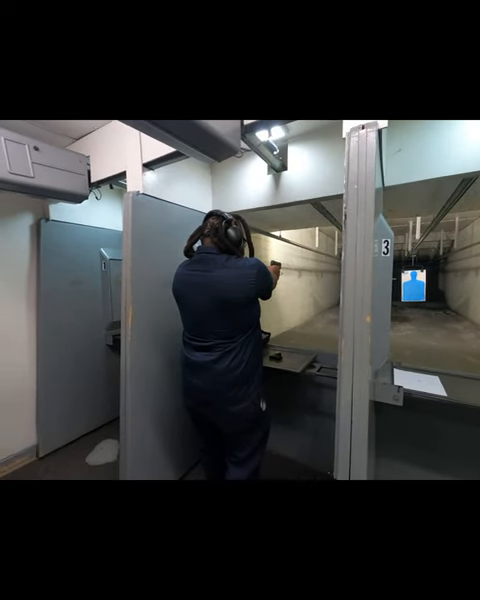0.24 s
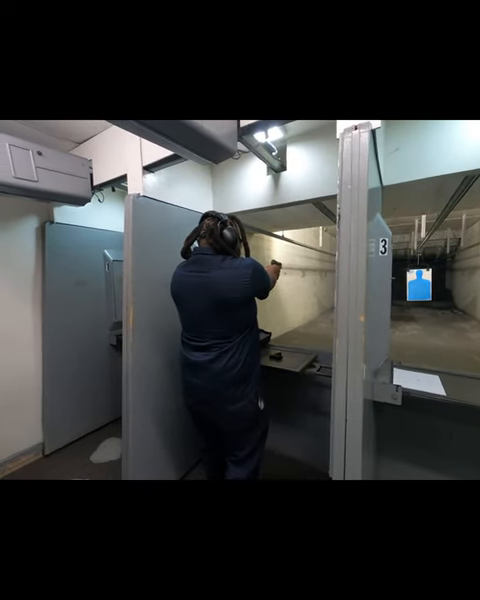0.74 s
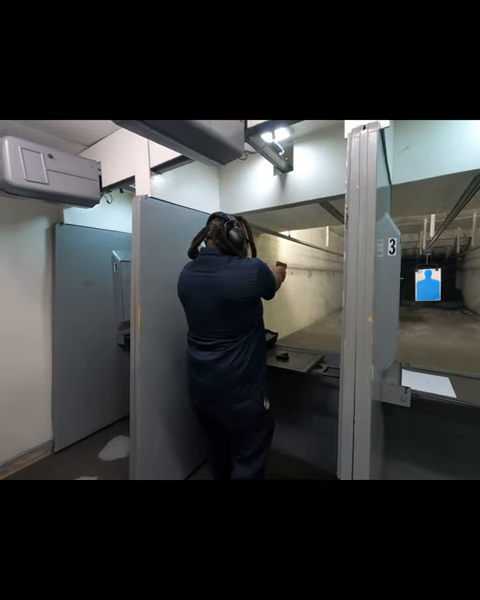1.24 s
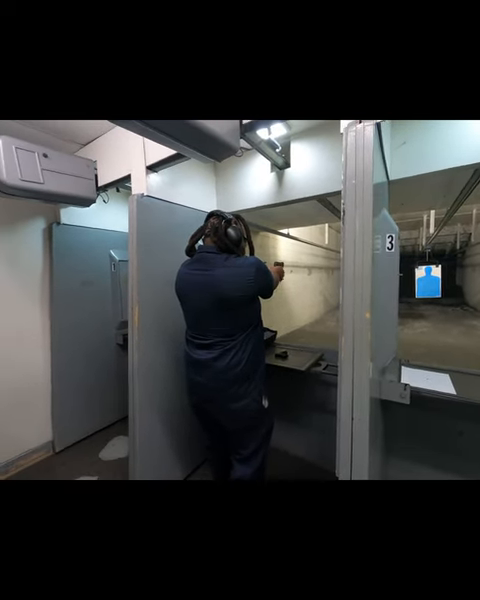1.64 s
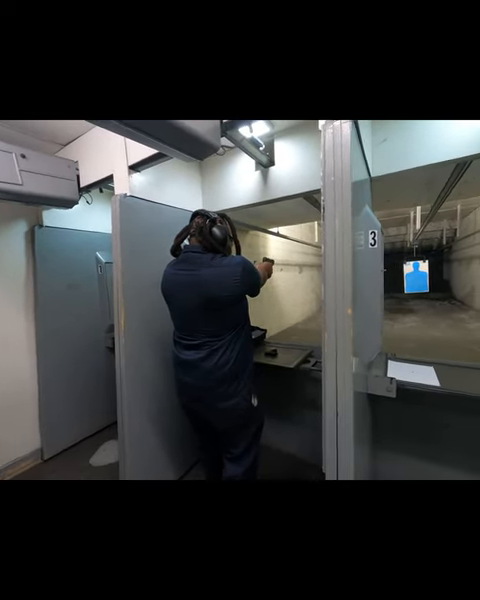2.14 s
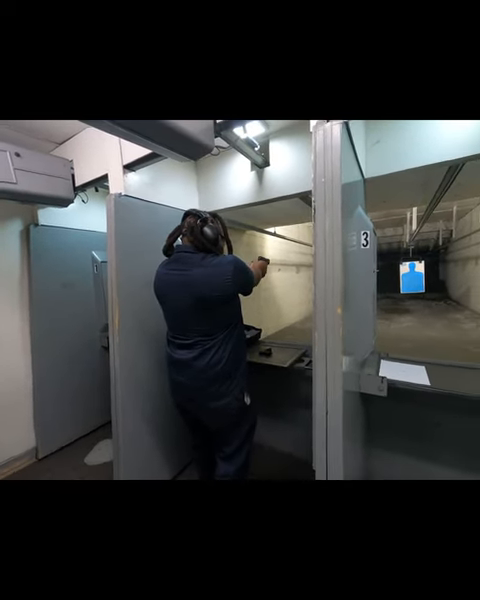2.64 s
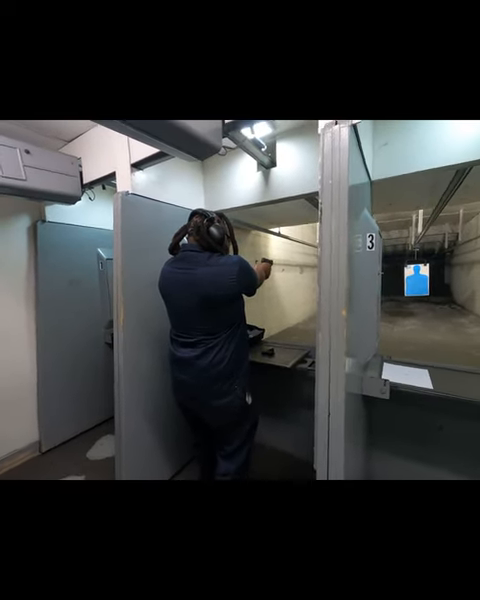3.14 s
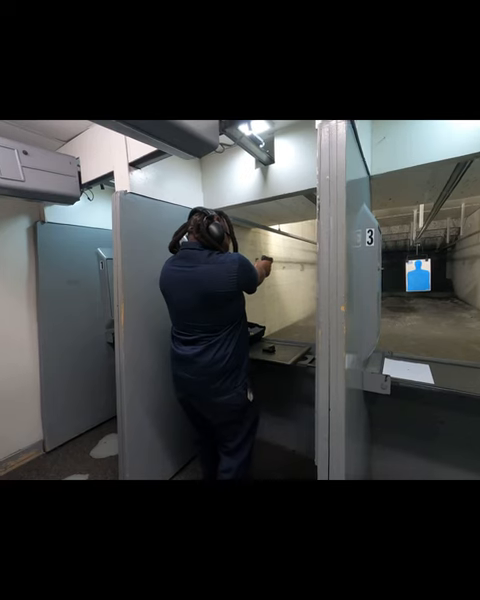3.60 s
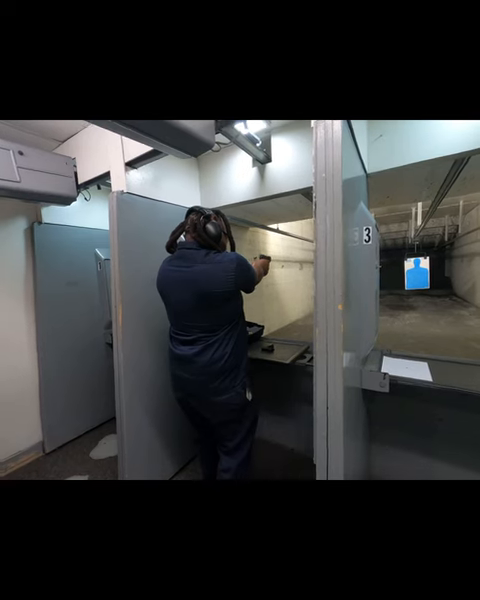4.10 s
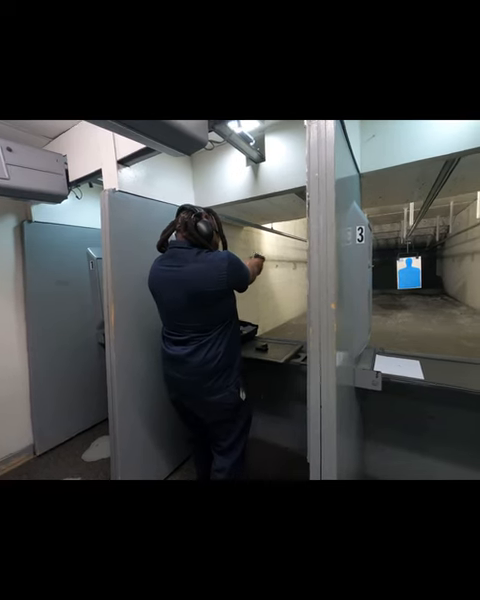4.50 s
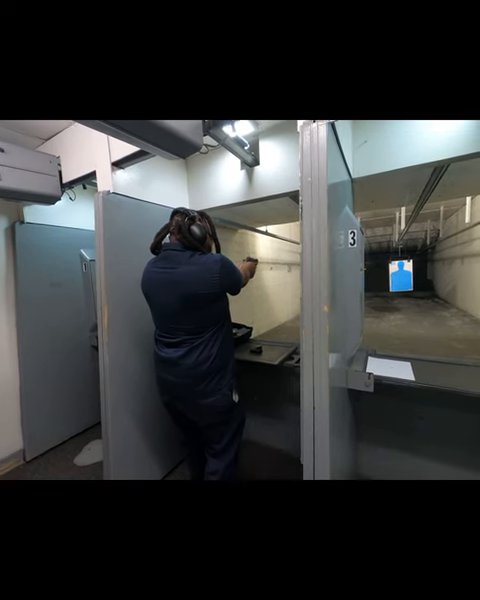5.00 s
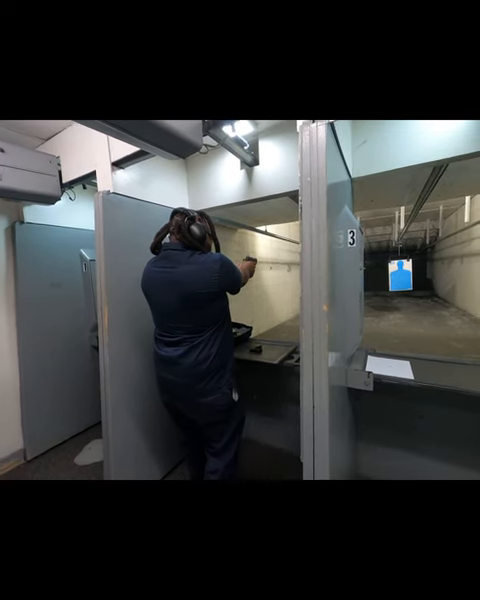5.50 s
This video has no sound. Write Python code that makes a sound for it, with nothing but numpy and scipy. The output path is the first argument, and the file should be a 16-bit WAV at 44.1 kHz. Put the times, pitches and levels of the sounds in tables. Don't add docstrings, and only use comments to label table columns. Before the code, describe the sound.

Three loud pistol shots about two seconds apart crack and boom through a concrete indoor range, echoes rolling, brass cases ticking on the floor.

```python
import sys
import numpy as np
from scipy import signal
from scipy.fft import rfft, irfft
from scipy.io import wavfile
from scipy.ndimage import uniform_filter1d

SR = 44100
rng = np.random.default_rng(int(sys.argv[2]) if len(sys.argv) > 2 else 0)


def invert_db(x):
    u = np.asarray(x, float) / 20
    return 10 ** u


def master(y):
    cut = np.clip(np.atleast_2d(y).T, -1, 1)
    pcm = np.round(cut * 32767)
    wavfile.write(sys.argv[1], SR, pcm.astype(np.int16))


N = 253575
TIME = np.arange(N) / SR
FOLD_S = 0.71


def unit(x):
    return x / np.sqrt(np.mean(x ** 2, axis=-1, keepdims=True))


def band(x, hz, width):
    return signal.lfilter(*signal.iirpeak(min(hz, .45 * SR), hz / width, SR), x)


def on_log(hz, at, values):
    return np.interp(np.log(hz), np.log(at), values)


def dull(x):
    return signal.sosfilt(signal.butter(3, 9200, fs=SR, output="sos"), x)


def add(out, x, s):
    i = int(round(s * SR))
    x = x[:, max(-i, 0):max(N - i, 0)]
    out[:, max(i, 0):max(i, 0) + x.shape[1]] += x


def coloured(size, table, stripe_db=0, strong_db=0, strong_hz=1000):
    stripe_width_hz = 394
    hz = np.maximum(np.fft.rfftfreq(size, 1 / SR), 1)
    stripes = rng.standard_normal(100)[(hz / stripe_width_hz).astype(int)]
    db = on_log(hz, *np.transpose(table)) + stripe_db * stripes
    db = db + strong_db * (abs(hz - strong_hz) < stripe_width_hz / 2)
    return unit(irfft(rfft(rng.standard_normal((2, size))) * invert_db(db), size))


# pitch in Hz, level in dB per Hz.
FAN_SPECTRUM = [(12, -48.5), (20, -19.5), (104, -24.5), (195, -11), (246, -1), (317, -5.5), (872, -7),
                (1500, -7.5), (1950, -40), (3300, -120)]


def fan():
    return invert_db(-58.5) * coloured(N, FAN_SPECTRUM)


# level in dB, hold in seconds, decay in dB/s, late level in dB, late decay in dB/s.
ANSWER_LEVELS = [
    (-23.5, 0.18, -77.5, -56.5, -4.5),
    (-17.5, 0.16, -42.5, -27.5, -12.5),
    (-18, .39, -23, -28, -7.5),
    (-27.5, 0.39, -23.5, -37.5, -12.5),
]
# burst in dB and its peak in seconds, swell in dB.
BOOTH_DB, BOOTH_PEAK_S = (3.5, 4.4, 4.8, 6.85), (.045, 0.034, 0.01, 0.034)
SWELL_DB = (4.4, 4.4, 1.3, 1.2)


def decay(t):
    first_return_s, round_trip_s, swell_s, swell_fade_s = 0.11, 0.17, 0.062, 0.24
    knee_s = 0.08
    swell = np.exp(-((t - first_return_s) % round_trip_s) / swell_s)
    swell = uniform_filter1d(swell, int(0.016 * SR))
    swell = 2 * (swell - swell.mean()) * np.exp(-t / swell_fade_s)
    levels = []
    for row, swell_db, booth_db, peak in zip(ANSWER_LEVELS, SWELL_DB, BOOTH_DB, BOOTH_PEAK_S):
        db, hold, fall, late_db, late_fall = row
        early = db + fall * knee_s * np.logaddexp(0, (t - hold) / knee_s)
        early = early + booth_db * t / peak * np.exp(1 - t / peak)
        both = np.hypot(invert_db(early), invert_db(late_db + late_fall * t))
        levels.append(20 * np.log10(both) + swell_db * swell)
    return np.array(levels)


SLICES_HZ = 22 * 2 ** (np.arange(58) / 6)


def slices(x):
    size = x.shape[-1]
    octave = np.log2(np.maximum(np.fft.rfftfreq(size, 1 / SR), 1))
    spectrum = rfft(x)
    for hz in SLICES_HZ:
        distance = np.clip(6 * (octave - np.log2(hz)), -1, 1)
        yield hz, irfft(spectrum * np.cos(np.pi / 2 * distance) ** 2, size)


REGION_HZ = (80, 280, 870, 2700)
# pitch in Hz, level in dB, extra decay in dB/s.
ECHO_COLOUR = [(45, -17, 3.5), (70, -3, -3), (110, -6, -0.5), (164, -2, -3), (197, -7, -2), (252.5, 0.5, 0),
               (322, -6, 0), (1120, -2.5, 1.5), (1530, -7, 1.5), (2560, -5.5, 0), (4500, -10, -10),
               (6370, -14.5, -22), (8470, -14.5, -30.5), (12500, -26.5, -37.5)]
# pitch in Hz, level in dB over the other echoes.
STANDING_WAVES = [(67, 4), (126, 2.5), (153, 7.5), (169, 4.5), (252, 7.5), (297, 3.5), (365, 6), (409, 7),
                  (437, 0), (527, 6), (552, 3.5), (612, 2), (665, 3.5), (745, 6.5), (852, 1.5), (970, -1),
                  (1064, 6.5), (1140, 7), (1264, 7), (1329, 1)]
# pitch in Hz, level in dB, time to fall 60 dB in seconds.
SLOW_HUMS = [(197.4, -43, 9.6), (250.2, -34, 10.3), (249, -39, 6.6), (373, -38, 8.7), (672, -38, 7.4)]
# pitch in Hz, level in dB.
FAINT_TREBLE = [(5000, -110), (8000, -84), (9000, -80), (10500, -69)]


def answer(size):
    t = np.arange(size) / SR
    levels = decay(t)
    at, colour_db, slope_db = np.transpose(ECHO_COLOUR)
    noise = rng.standard_normal((2, size))
    phase = rng.uniform(0, 2 * np.pi, (len(STANDING_WAVES), 2, 1))
    waves = sum(invert_db(db) * np.sin(2 * np.pi * hz * t + p) for (hz, db), p in zip(STANDING_WAVES, phase))
    noise = noise + 0.018 * waves
    lump_db, hop = 1.2, int(.04 * SR)
    lumps = np.repeat(rng.standard_normal((4, size // hop + 1)), hop, axis=1)[:, :size]
    levels = levels + lump_db * uniform_filter1d(lumps, hop)
    out = np.zeros((3, 2, size))
    for hz, part in slices(noise):
        place = on_log(hz, REGION_HZ, np.arange(4))
        k = min(int(place), 2)
        db = levels[k] + (place - k) * (levels[k + 1] - levels[k])
        db = db + on_log(hz, at, colour_db) + on_log(hz, at, slope_db) * t - 3
        too_faint = np.maximum(on_log(hz, *np.transpose(FAINT_TREBLE)) - db, 0) * (hz > 4000)
        out[int(hz > 350) + int(hz > 9800)] += unit(part) * invert_db(db - .9 * too_faint)
    out[0] += sum(invert_db(db - 60 * t / t60) * np.sin(2 * np.pi * hz * t) for hz, db, t60 in SLOW_HUMS)
    return out


def patchy(treble):
    top_hz, hole_share, hole_db = 14600, .3, -25
    hz, _, frames = signal.stft(treble, SR, nperseg=1024)
    count = frames.shape[-1]
    chance = rng.random((len(hz) // 10 + 1, count // 4 + 1))
    chance = chance.repeat(10, axis=0).repeat(4, axis=1)
    holes = chance[:len(hz), :count] < hole_share * (hz[:, None] / 12000) ** 4
    kept = frames * invert_db(hole_db * holes) * (hz[:, None] < top_hz)
    return signal.istft(kept, SR)[1][:, :treble.shape[-1]]


SHOT_TIMES = (-1.13, .5792, 2.5293, 4.4085)
# level in dB, early duck in dB, crack in dB, crack brightness in dB.
SHOT_LEVELS = [
    (-2.5, -2, -13.5, 0),
    (-2, -5.5, -11, 6),
    (-0.5, -1, -11.5, -3),
    (-0.83, -1, -11, -5),
]


def pistol():
    bass_duck, treble_duck = .4, .4
    size = 2 * SR
    bass, middle, treble = answer(size)
    t, out = np.arange(size) / SR, np.zeros((2, N))
    ends = [*SHOT_TIMES[1:], N / SR]
    early = np.clip((.105 - t) / 0.025, 0, 1)
    for s, end, (db, duck_db, crack_db, bright_db) in zip(SHOT_TIMES, ends, SHOT_LEVELS):
        top = patchy(treble) if s < FOLD_S else treble
        tail = bass * invert_db(bass_duck * duck_db * early) + middle + top * invert_db(treble_duck * duck_db)
        tail = tail * invert_db(db + duck_db * early) * np.clip(t / 0.0024, 0, 1)
        add(out, tail[:, :int((end - s) * SR)], s)
        add(out, crack(bright_db) * invert_db(crack_db), s)
    return out


# start in seconds, tick in dB, tick pitch in Hz, wash in dB, ring in dB.
CASE_LANDINGS = [(.1177, -39.5, 3800, -13, -90.5), (.1178, -51.5, 7600, -30, -100),
                 (0.1297, -46, 4000, -25, -100), (.129, -58, 12500, -31, -100),
                 (.5378, -61, 5500, -25, -100), (.5432, -70, 5500, -21, -100), (.549, -62, 4500, -18, -100),
                 (1.3629, -75, 12000, -28, -62), (2.345, -77.5, 4800, -5, -100),
                 (3.536, -51, 3570, -20, -79), (3.5362, -75, 7930, -30, -100),
                 (3.537, -58, 13500, -26, -100), (3.562, -68, 12900, -29, -70),
                 (5.6217, -59, 3600, -20, -90), (5.6218, -74, 8200, -20, -100),
                 (5.6219, -66, 12500, -30, -100)]
# pitch in Hz, level in dB, time to fall 60 dB in seconds.
BRASS_RING = [(10800, -7, .22), (11000, -1.5, .3), (13060, -9, .24)]


def cases():
    t, out = np.arange(SR) / SR, np.zeros((2, N))
    width_hz = 1900
    for s, tick_db, hz, wash_db, ring_db in CASE_LANDINGS:
        noise = rng.standard_normal((2, 2, len(t)))
        jitter = np.repeat(2.5 * rng.standard_normal(SR // 128 + 1), 128)[:SR]
        skitter = invert_db(uniform_filter1d(jitter, 64))
        hit = 1.5 * invert_db(-60 * t / 0.014) + 0.95 * skitter * invert_db(-60 * t / 0.23)
        tick = hit * unit(band(band(noise[0], hz, width_hz), hz, width_hz))
        wash_hz = .65 * hz
        wash = unit(band(band(noise[1], wash_hz, width_hz), wash_hz, width_hz))
        wash = invert_db(wash_db - 60 * t / 1.1) * wash
        ring = sum(invert_db(db - 60 * t / t60) * np.sin(2 * np.pi * f * t) for f, db, t60 in BRASS_RING)
        add(out, invert_db(tick_db) * dull(tick + wash) + invert_db(ring_db) * skitter * ring, s)
    return out


# level in dB, length in seconds.
SMEAR_LEVELS = [
    (-23, 0.032),
    (-14.5, 0.046),
    (-15, .045),
]
# pitch in Hz, level in dB per Hz.
SMEAR_SPECTRA = [
    [(35, -36), (60, -4.5), (657, -14), (953, 1), (2150, -22), (3340, -20.5), (6120, -29), (7900, -30),
     (15500, -62.5)],
    [(35, -41), (60, -7), (443, -3.5), (999, -18), (1480, -7), (3190, -16.5), (4030, -16.5), (9510, -30.5),
     (15500, -46)],
    [(35, -43), (60, -15), (869, -2.5), (1590, -20.5), (2150, -6), (4030, -24), (4320, -25.5), (8470, -20),
     (15500, -43.5)],
]
SMEAR_STRIPES_HZ = (7900, 9400, 4370)


def smears():
    out = np.zeros((2, N))
    t = np.arange(4096) / SR
    rows = zip(SHOT_TIMES[1:], SMEAR_LEVELS, SMEAR_STRIPES_HZ, SMEAR_SPECTRA)
    for s, (db, length), strong_hz, spectrum in rows:
        rise = np.sin(np.pi / 2 * np.minimum(t / length, 1)) ** 3.6
        window = rise * invert_db(-60 * np.maximum(t - length, 0) / 0.016)
        noise = coloured(len(t), spectrum, stripe_db=2, strong_db=10, strong_hz=strong_hz)
        add(out, invert_db(db) * window * noise, s - length)
    return out


# start in seconds, level in dB.
BOOTH_ECHOES = [
    (0, -0.5),
    (.00095, -6.5),
    (.0019, -5),
    (.0031, -7),
    (.0045, -4.5),
    (.0085, -12),
]
# pitch in Hz, width in Hz, level in dB.
CRACK_RESONANCES = [
    (700, 1900, 2),
    (1050, 600, -1),
    (3150, 900, 2.5),
    (8600, 1600, -19),
]


def crack(bright_db):
    t = np.arange(768) / SR
    wave = 0
    for s, db in BOOTH_ECHOES:
        ramp = 2 * (t - s) / 0.00055 - 1.3
        wave = wave + invert_db(db) * np.where((t >= s) & (t < s + .0005), ramp, 0)
    wave = wave + .3 * rng.standard_normal((2, len(t))) * invert_db(-60 * t / 0.031)
    ringing = 0
    for hz, width, db in CRACK_RESONANCES:
        ringing = ringing + invert_db(db + bright_db * (hz > 2000)) * band(wave, hz, width)
    return unit(dull(ringing))


# pitch in Hz, level in dB.
SIDE_SPECTRUM = [(60, -7), (110, -7.5), (200, -12), (500, -13.5), (1290, -5.5), (2380, -3.5), (4400, 0.5),
                 (9000, -1.5)]


def scene():
    top_side_hz, top_side_db, left_lean = 11600, 2, .07
    fold_db_per_s2 = -100
    mid, side = pistol() + smears() + cases() + fan()
    high_pass = signal.cheby2(10, 60, top_side_hz - 500, "high", fs=SR, output="sos")
    top = signal.sosfilt(high_pass, side)
    hz = np.maximum(np.fft.rfftfreq(N, 1 / SR), 1)
    side_gain = invert_db(on_log(hz, *np.transpose(SIDE_SPECTRUM)))
    side = irfft(rfft(side) * side_gain, N) + left_lean * mid
    width = invert_db(-1 + fold_db_per_s2 * np.maximum(TIME - FOLD_S, 0) ** 2)
    side = side * width + invert_db(top_side_db) * top * np.clip(1 - width, 0, 1)
    return np.array([mid + side, mid - side])


def low_pass(x):
    return signal.sosfilt(signal.butter(12, 15720, fs=SR, output="sos"), x)


def record(dry):
    limit, top_hz = 0.99, 13900
    rounded = limit * np.tanh(dry / limit)
    cut = signal.sosfilt(signal.butter(6, top_hz, fs=SR, output="sos"), rounded)
    return low_pass(cut)


dry = scene()
out = record(dry)
master(out)
```